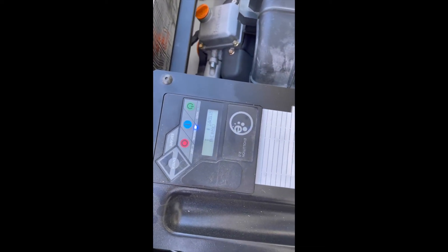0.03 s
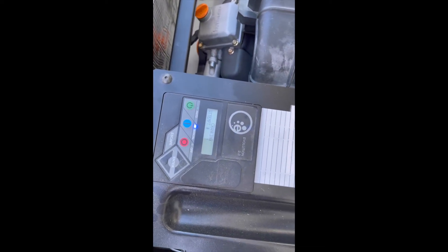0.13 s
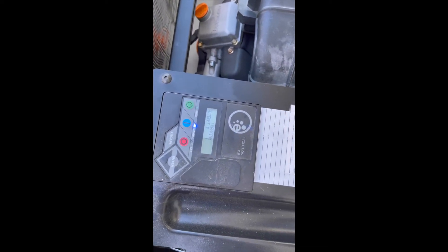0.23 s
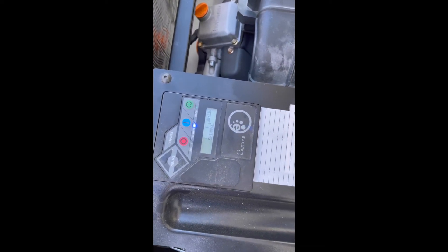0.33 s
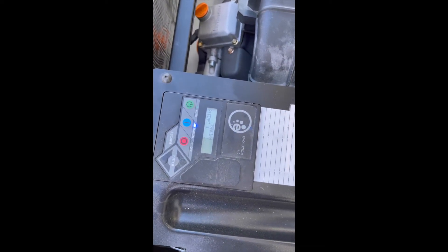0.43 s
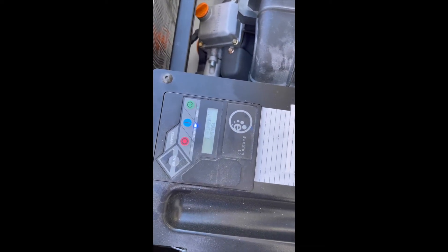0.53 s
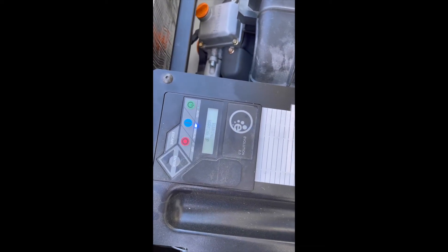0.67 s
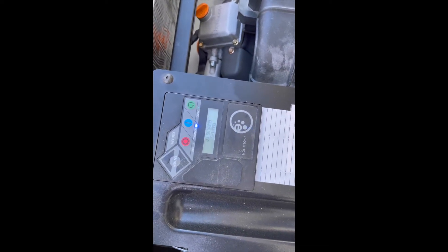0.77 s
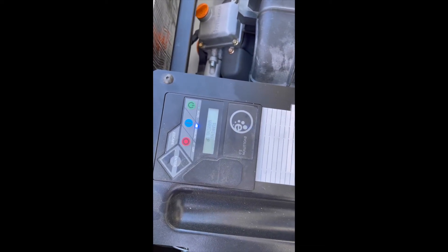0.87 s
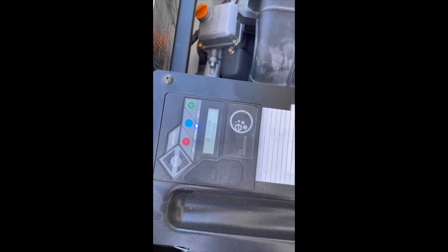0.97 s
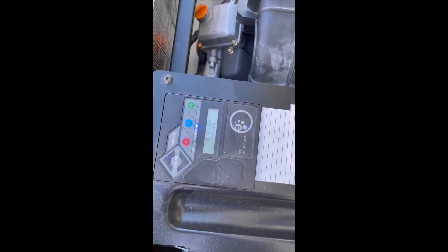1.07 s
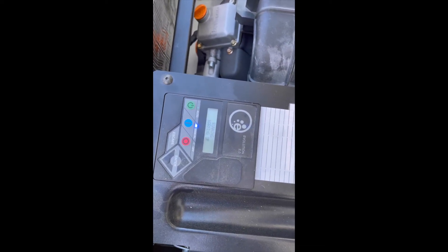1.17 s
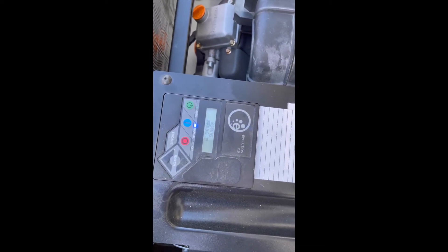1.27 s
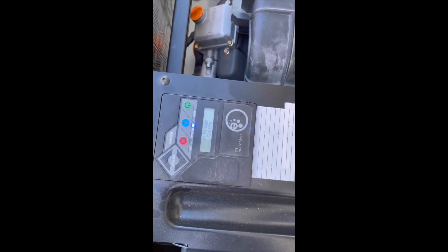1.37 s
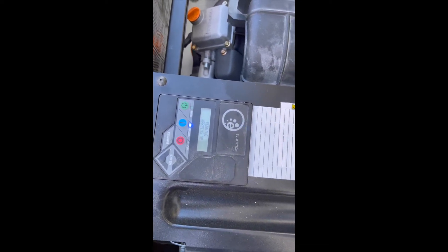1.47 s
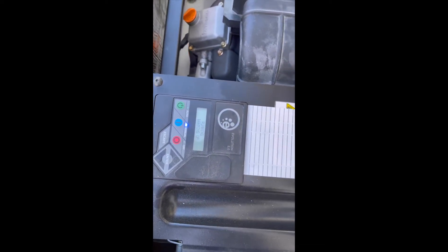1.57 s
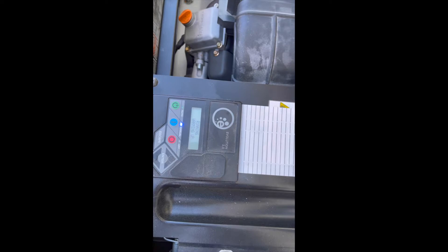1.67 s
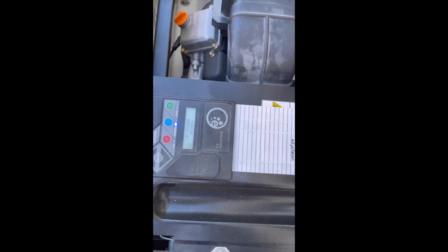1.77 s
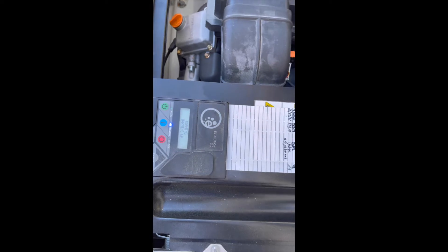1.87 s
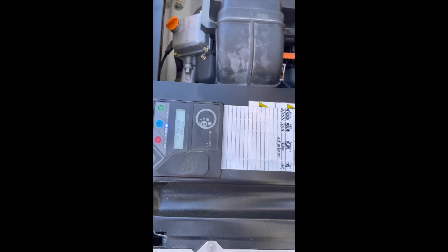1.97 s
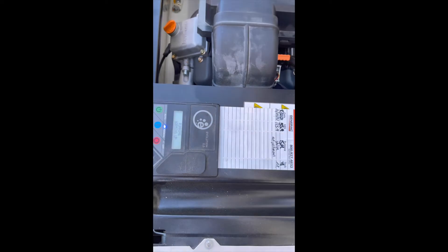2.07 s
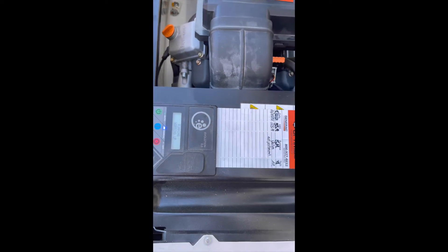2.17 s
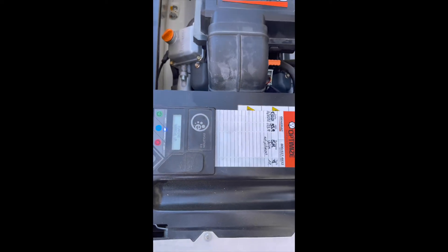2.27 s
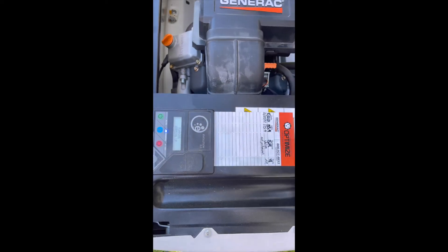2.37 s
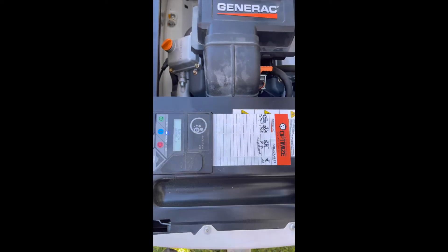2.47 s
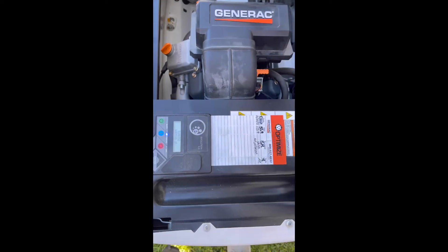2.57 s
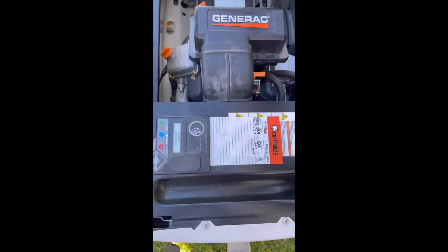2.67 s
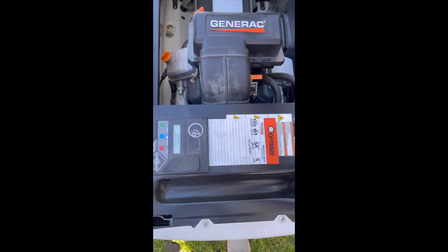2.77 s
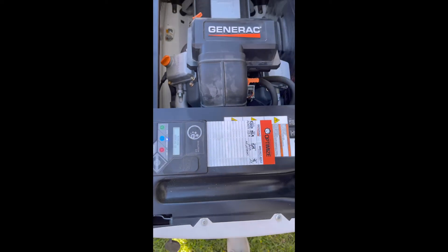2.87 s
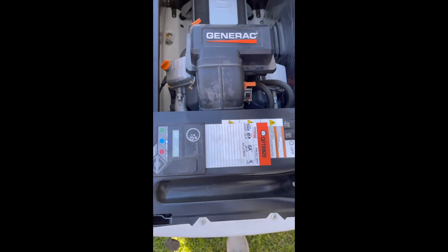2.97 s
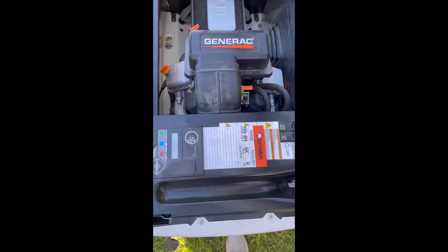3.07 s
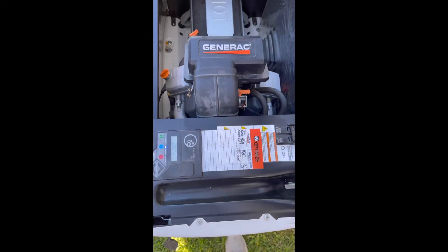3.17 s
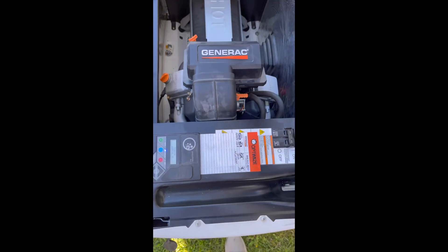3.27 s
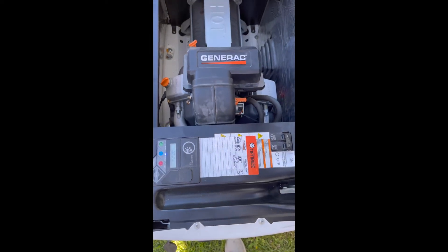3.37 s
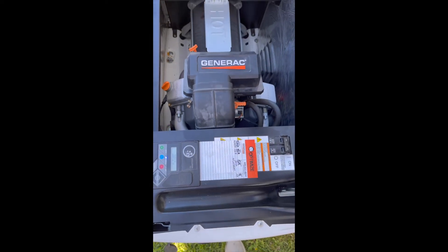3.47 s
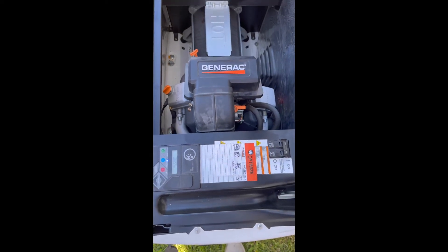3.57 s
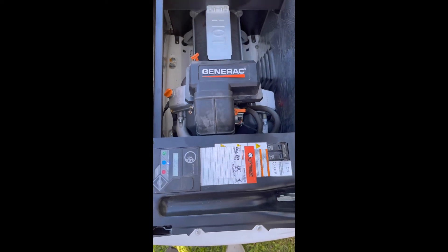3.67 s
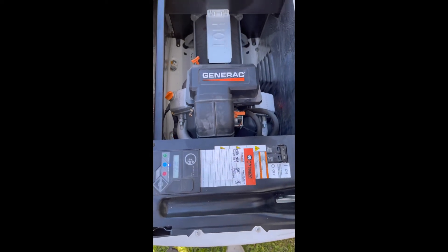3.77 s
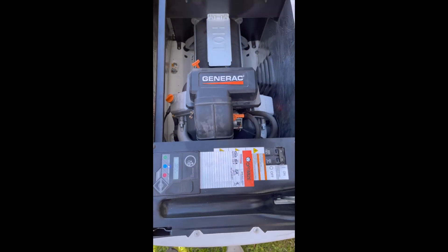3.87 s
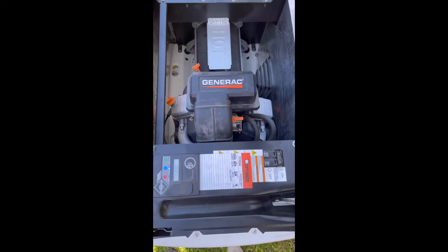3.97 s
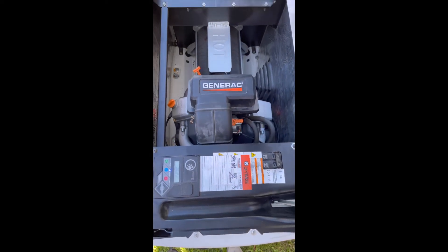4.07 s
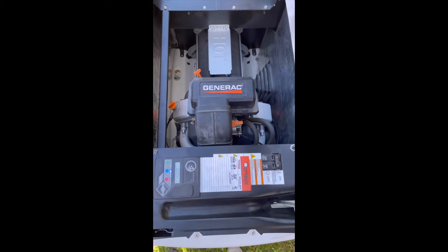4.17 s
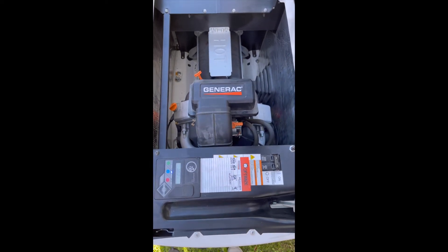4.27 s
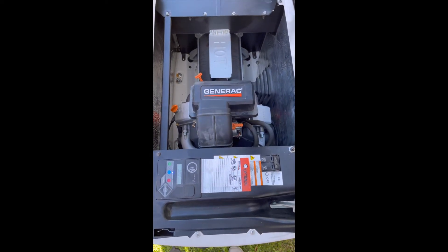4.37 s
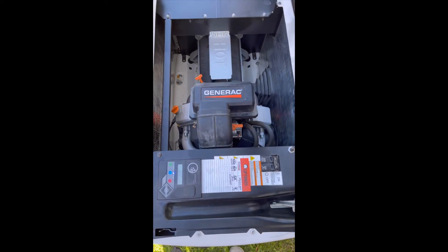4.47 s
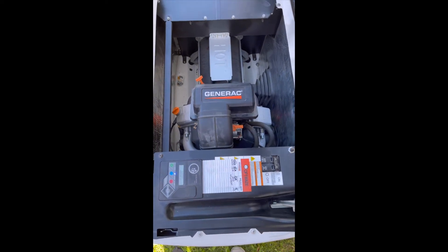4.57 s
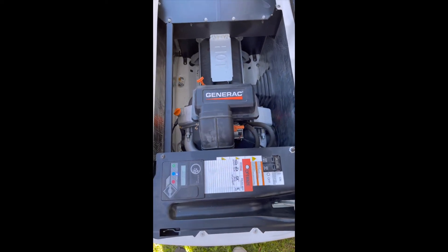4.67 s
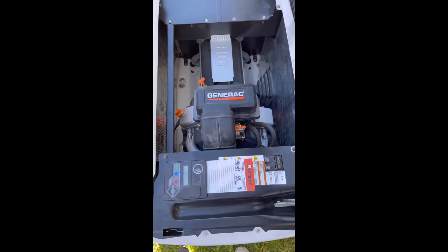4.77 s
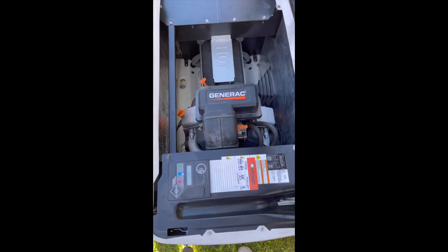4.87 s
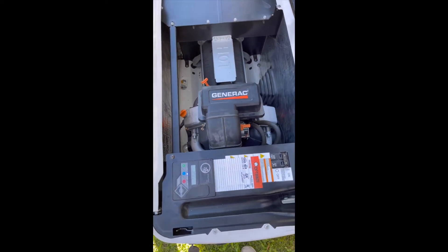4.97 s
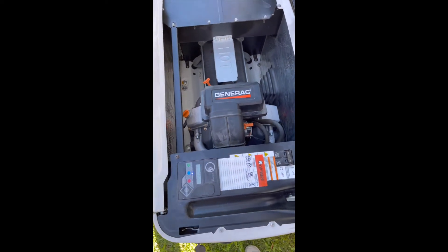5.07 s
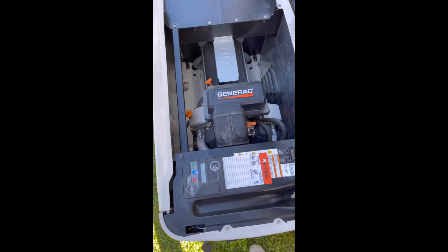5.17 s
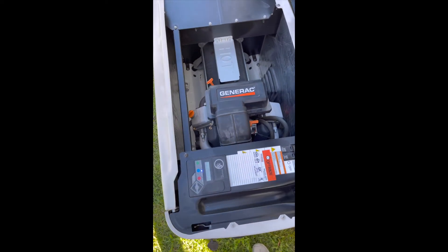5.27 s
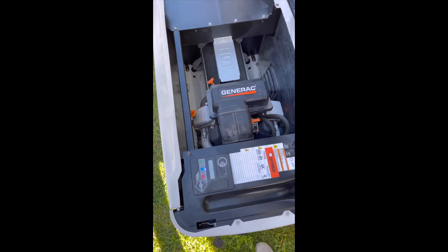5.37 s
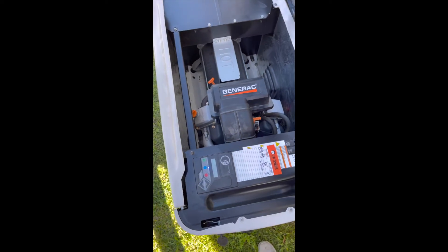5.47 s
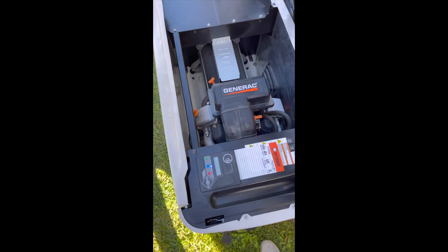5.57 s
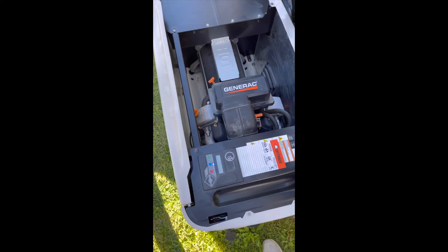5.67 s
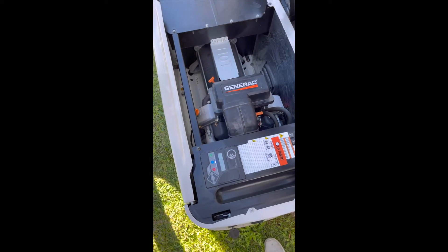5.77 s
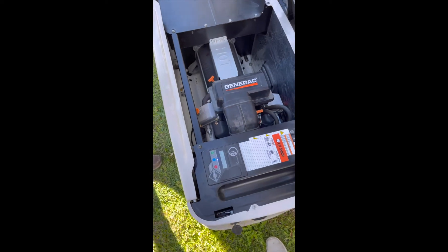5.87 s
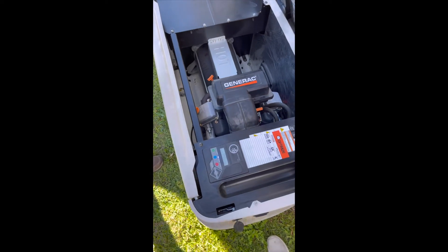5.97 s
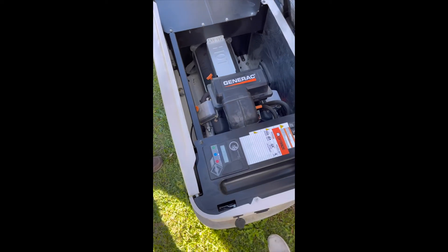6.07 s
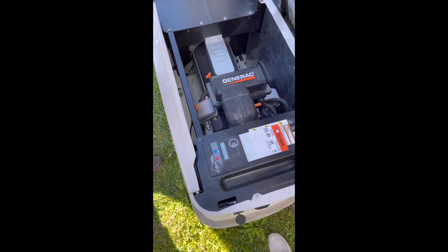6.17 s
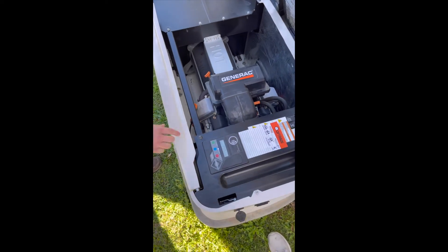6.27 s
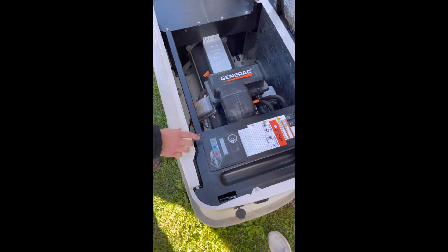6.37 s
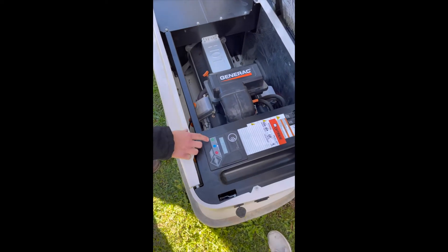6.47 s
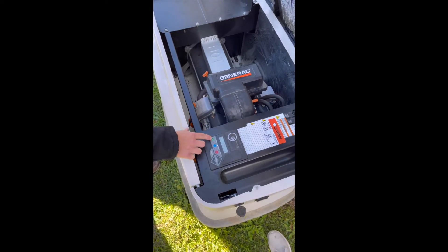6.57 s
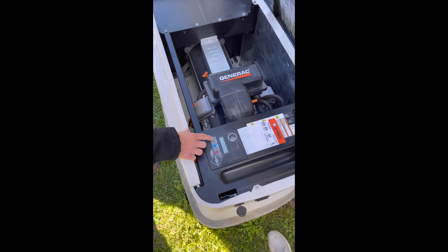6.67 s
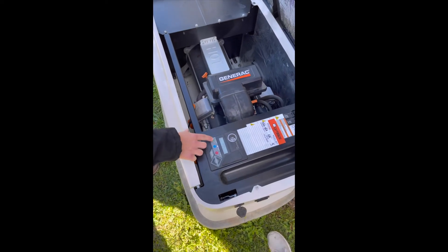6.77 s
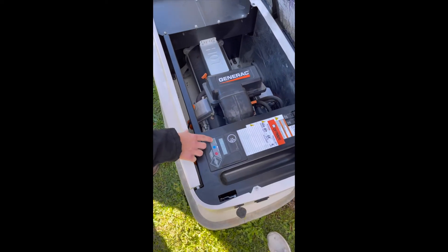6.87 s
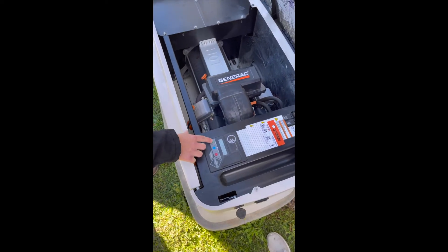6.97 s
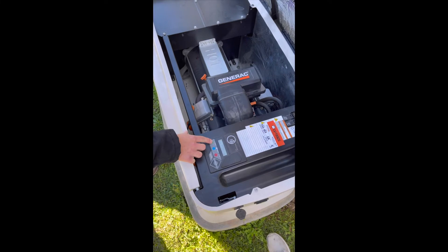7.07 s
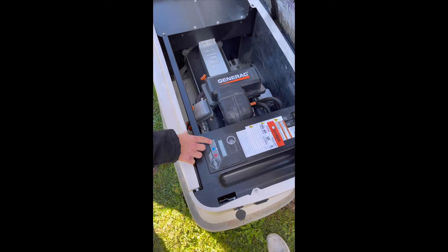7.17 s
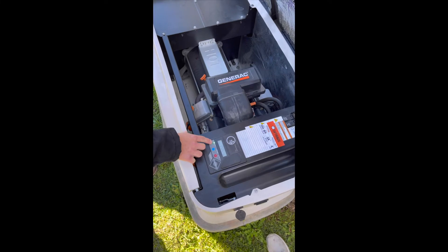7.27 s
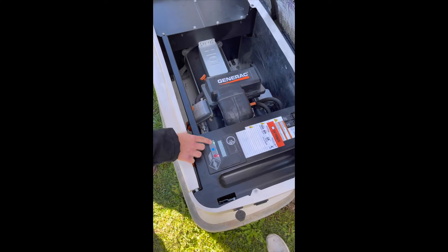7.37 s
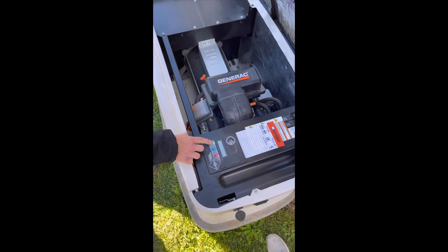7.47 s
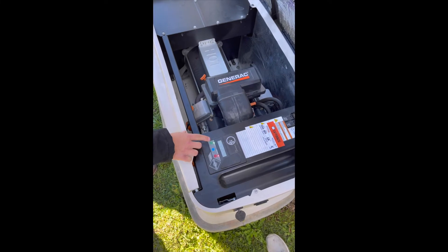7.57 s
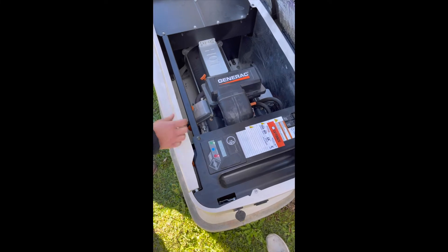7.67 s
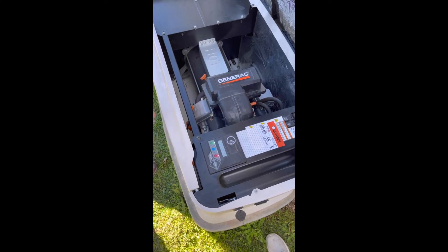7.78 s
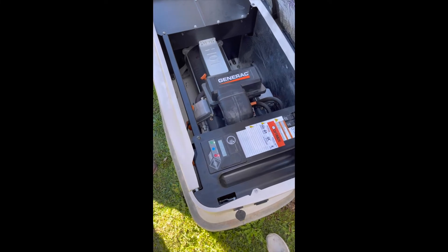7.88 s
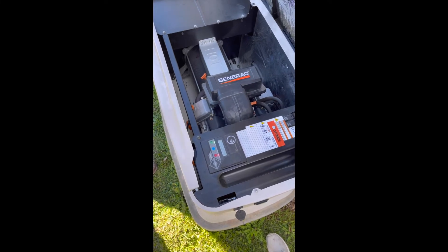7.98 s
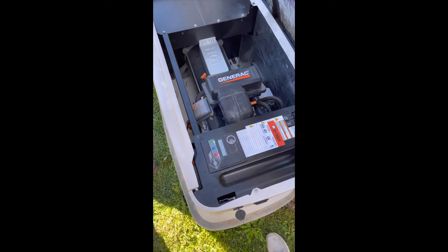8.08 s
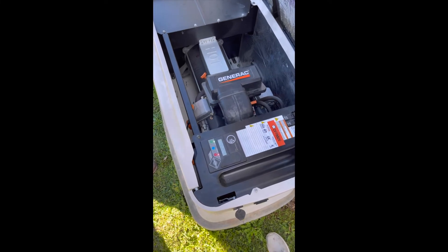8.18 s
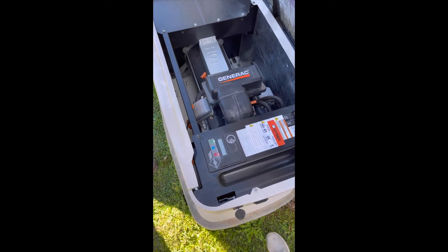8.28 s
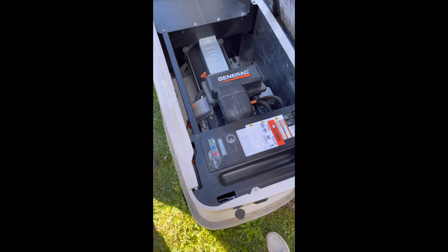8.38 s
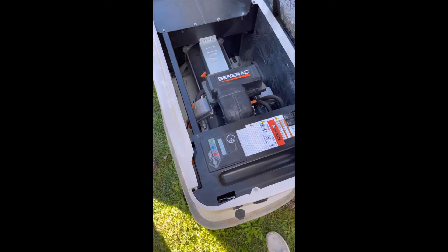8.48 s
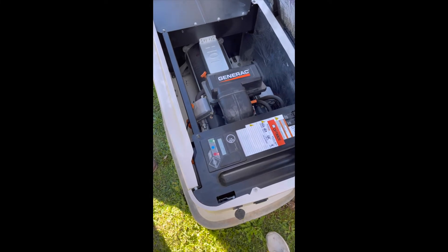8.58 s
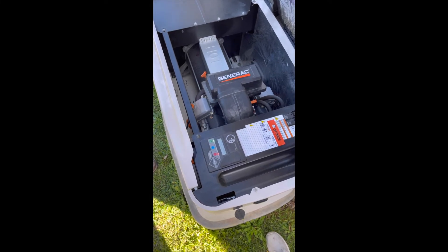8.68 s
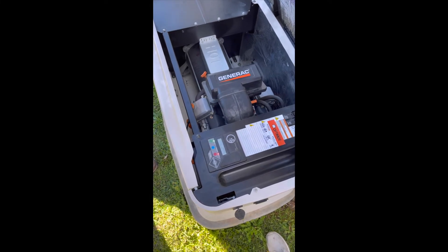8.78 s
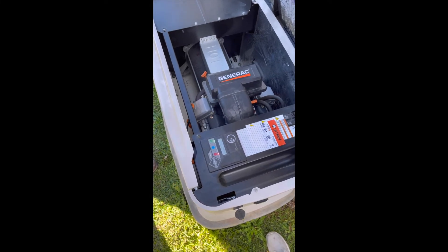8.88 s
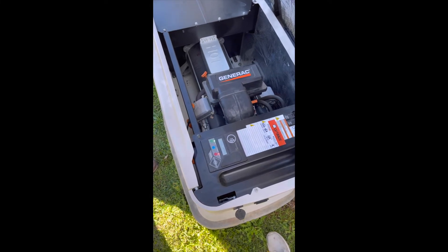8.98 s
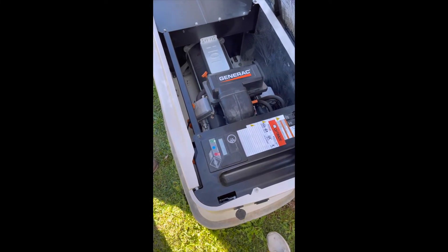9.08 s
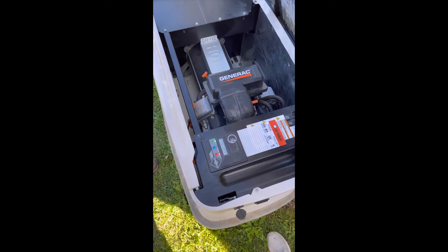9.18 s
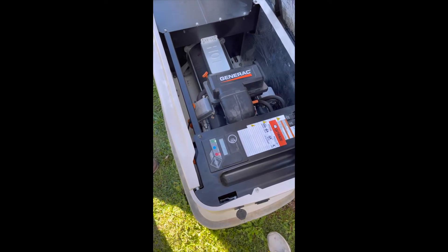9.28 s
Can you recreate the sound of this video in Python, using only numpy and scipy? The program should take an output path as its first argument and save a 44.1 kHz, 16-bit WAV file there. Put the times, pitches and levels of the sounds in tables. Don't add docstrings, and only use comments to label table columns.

```python
import sys
import numpy as np
from scipy import signal
from scipy.fft import rfft, irfft
from scipy.io import wavfile
from scipy.ndimage import uniform_filter1d

SR = 44100
rng = np.random.default_rng(int(sys.argv[2]) if len(sys.argv) > 2 else 0)


def natural_amplitude(level_db):
    exponent = np.asarray(level_db, float) / 20
    return 10 ** exponent


def log_audio(samples):
    frames = np.atleast_2d(samples).T
    limited = np.clip(frames, -1, 1)
    pcm = np.round(limited * 32767).astype(np.int16)
    wavfile.write(sys.argv[1], SR, pcm)


N = 411012
TIME = np.arange(N) / SR
HZ = np.fft.rfftfreq(N, 1 / SR)
CUT_S, SETTLE_S = 7.485, .08


def curve(table):
    s, *columns = np.transpose(table)
    return [np.interp(TIME, s, c) for c in columns]


def over_hz(table):
    hz, value = np.transpose(table)
    return np.interp(np.log(HZ + 1), np.log(hz), value)


def coloured(x, table):
    y = irfft(rfft(x) * natural_amplitude(over_hz(table)), N)
    return y / y.std()


def walk(rate, size=N):
    k = int(SR / rate * size / N)
    held = np.repeat(rng.standard_normal(size // k + 1), k)
    return 1.35 * uniform_filter1d(uniform_filter1d(held, k), k)[:size]


def grit(spread_db, rate):
    return rng.standard_normal((3, N)) * natural_amplitude(spread_db * walk(rate))


# (time [s], speed [turns/s])
RUN_UP = [(0, 43.1), (.18, 44.37), (.36, 46.07), (.7, 48.77), (.91, 49.7), (1.14, 51.2), (1.38, 51.77),
          (1.55, 52.77), (1.79, 53.63), (2.2, 54.8), (2.62, 56.37), (3.06, 57.47), (3.6, 57.8),
          (4.21, 58.9), (4.65, 58.9), (5.5, 59.47), (6.39, 59.77), (7.42, 60.05)]


def crank_speed():
    coast_s = 2.455
    return curve(RUN_UP)[0] * np.exp(-np.maximum(TIME - CUT_S, 0) / coast_s)


# (time [s], opening [0-1])
THROTTLE = [
    (0.0, 0.36),
    (0.5, 0.71),
    (1.2, 0.71),
    (2.3, 0.65),
    (3.3, 0.5),
    (4.2, 0.07),
    (5.7, 0.15),
    (7.4, 0.19),
]
# (centre [Hz], width [Hz], boost [dB])
HOUSING = [(84, 24, 4), (126, 20, 12), (146, 8, 3), (175, 74, 14), (227, 24, 11), (293, 36, 12),
           (342, 8, 6), (420, 12, 6), (440, 44, 9), (468, 24, 8), (532, 19, 4), (583, 47, 6), (719, 30, 8),
           (898, 12, 7)]
# (order [per turn], full throttle [dB rms], governed [dB rms],
# coasting [dB rms])
CRANK_ORDERS = [(1.0, -49.0, -46.0, -55.0), (2.0, -45.0, -59.0, -60.0), (3.0, -30.0, -57.0, -57.0),
                (4.0, -40.0, -43.0, -53.0), (5.0, -50.0, -44.0, -53.0), (6.0, -55.0, -41.0, -54.0),
                (7.0, -40.0, -41.0, -57.0), (8.0, -30.0, -42.0, -50.0), (9.0, -43.0, -43.0, -56.0),
                (10.0, -44.0, -42.0, -52.0), (11.0, -60.0, -41.0, -60.0), (12.0, -41.0, -43.0, -49.0),
                (13.0, -50.0, -42.0, -55.0), (14.0, -45.0, -43.0, -54.0), (15.0, -49.0, -43.0, -49.0),
                (16.0, -41.0, -45.0, -48.0), (17.0, -45.0, -53.0, -56.0), (18.0, -44.0, -39.0, -54.0),
                (1.5, -48.0, -49.0, -45.0), (2.5, -42.0, -55.0, -53.0), (3.5, -54.0, -49.0, -61.0),
               (4.5, -50.0, -49.0, -56.0), (5.5, -34.0, -51.0, -54.0), (6.5, -34.0, -47.0, -53.0),
               (7.5, -40.0, -48.0, -55.0), (8.5, -45.0, -46.0, -58.0), (9.5, -43.0, -48.0, -56.0),
               (10.5, -49.0, -47.0, -61.0), (11.5, -54.0, -48.0, -55.0), (12.5, -53.0, -43.0, -59.0),
               (13.5, -46.0, -50.0, -61.0), (14.5, -55.0, -44.0, -56.0), (15.5, -49.0, -49.0, -59.0),
               (16.5, -42.0, -49.0, -58.0), (17.5, -48.0, -49.0, -58.0)]


def crank_tones(turns, speed):
    step = 8
    time, throttle = TIME[::step], curve(THROTTLE)[0][::step]
    turns, speed = turns[::step], speed[::step]
    size = len(time)
    grid = np.arange(1200)
    boost_db = sum(db / (1 + (2 * (grid - hz) / width) ** 2) for hz, width, db in HOUSING)
    cut = np.clip((time - CUT_S) / SETTLE_S, 0, 1)
    pumping_db = 1.7 + 22 * np.log10(speed / 46)
    out = 0
    for order, full_db, governed_db, coast_db in CRANK_ORDERS:
        uneven = min(order / 4, 1)
        burning_db = governed_db + throttle * (full_db - governed_db)
        db = (1 - cut) * burning_db + cut * (coast_db + pumping_db)
        db = db + 0.64 + boost_db[(order * speed).astype(int)]
        gain = natural_amplitude(db + 1.3 * uneven * walk(5, size=size))
        jitter = .25 * uneven * walk(7, size=size)
        out = out + gain * np.sin(2 * np.pi * (order * turns + rng.random()) + jitter)
    return np.sqrt(2) * signal.resample_poly(out, step, 1)[:N]


# (time [s], level [dB rms])
FAN_LEVEL = [(0, -31), (.8, -31), (1.3, -28), (1.9, -27), (2.3, -34), (2.8, -36), (3.3, -32), (4.2, -37),
             (5.1, -39), (5.6, -33), (6.2, -29), (7.5, -28), (7.9, -34), (8.15, -42), (8.7, -44),
             (8.9, -37), (9.05, -43), (9.32, -39)]
# (order [per turn], level [dB rms])
WHISTLES = [(22, -45), (24, -46), (26, -47), (28, -46), (30, -48), (32, -48), (36, -44), (38, -50),
            (40, -49), (42, -51)]


def fan(turns, speed):
    blades = 20
    level = natural_amplitude(curve(FAN_LEVEL)[0] + 1 + 1.3 * walk(12))
    out = level * np.sin(2 * np.pi * blades * turns + .3 * walk(25))
    fading = np.where(TIME > CUT_S + SETTLE_S, (speed / 58) ** 4, 1)
    for order, db in WHISTLES:
        level = natural_amplitude(db + 3.4 * walk(5)) * fading
        out += level * np.sin(2 * np.pi * order * turns + 0.69 * walk(20))
    return np.sqrt(2) * out


# (time [s], level [dB])
DISTANCE = [(0, -4), (.03, 0.5), (.12, -3), (.31, 0), (.55, -1), (1.4, 0.5), (1.7, -1.5), (2.1, -.5),
            (2.8, -2.5), (3.8, -3.5), (4.4, -3), (5.3, -2), (5.8, -5), (7, -5), (7.4, -4.5), (8.9, -4),
            (9.12, -6), (9.27, -5.5)]


def loudness(speed, close_db, share, burn_db, halving_db):
    dying = np.clip((TIME - CUT_S) / 0.6, 0, 1)
    slowing = np.where(TIME > CUT_S, np.log2(60 / speed), 0)
    return natural_amplitude(close_db + share * curve(DISTANCE)[0] - burn_db * dying - halving_db * slowing)


TICK_STAGES = [.6, 1.7, 3, 7.7, 8.45]


def staged(catching, rising, governed, coasting):
    return np.interp(TIME, TICK_STAGES, [catching, rising, governed, governed, coasting])


# (place in two-turn cycle [0-1], decay [ms], ring [Hz], width [Hz], level [dB])
BURN_TICKS = [
    (0.9, .79, 6620, 960, 0),
    (.7, 11, 11400, 1900, -3.5),
    (.35, 8.4, 11430, 1540, 0.5),
    (.35, 21, 3120, 126, -3),
    (.62, 21.5, 2310, 300, -5),
    (.4, 28, 1930, 140, -1.5),
    (0.5, 14., 9000, 680, -2),
]
# (place in two-turn cycle [0-1], decay [ms], ring [Hz], width [Hz], level [dB])
TAPPET_TICKS = [
    (.5, 5, 7050, 1550, 1),
    (.66, 12, 3300, 170, -2.5),
    (.1, 8, 4250, 320, -4),
]
# (place in two-turn cycle [0-1], decay [ms], ring [Hz], width [Hz], level [dB])
SLACK_TICKS = [
    (.41, 9.8, 10620, 930, 6.5),
    (.4, 2.1, 8000, 5000, -1.5),
    (.45, 6.8, 4200, 500, 3),
    (.8, 1.8, 8100, 2000, -7.5),
    (0.9, 5.5, 6700, 1700, -0.5),
    (0.8, 5.6, 3310, 360, 5),
    (.9, 4., 9900, 1200, -6),
]


def valve_ticks(turns):
    out, hiss = 0, rng.standard_normal((3, N))
    groups = [(BURN_TICKS, staged(0, -2, -8.5, -14), 2),
              (TAPPET_TICKS, staged(1, -7, -9, 0), 2.5),
              (SLACK_TICKS, staged(-24, -24, -18, -0.5), 2.5)]
    for ticks, stage_db, scatter_db in groups:
        for place, decay_ms, hz, width, db in ticks:
            cycle = np.floor(turns / 2 - place).astype(int) + 1
            strength = natural_amplitude(scatter_db * rng.standard_normal(N // 100))
            strike = np.diff(cycle, prepend=cycle[0]) * strength[cycle]
            puff = signal.lfilter([1], [1, -np.exp(-1000 / (decay_ms * SR))], strike)
            band = signal.butter(3, [hz - width / 2, hz + width / 2], "band", fs=SR, output="sos")
            out = out + signal.sosfilt(band, puff * natural_amplitude(stage_db + db + 14) * hiss)
    return out


# (frequency [Hz], density [dB per Hz])
GEAR_COLOUR = [(4600, -18.5), (5600, 0.5), (6100, -2), (6800, -1), (8200, -3.5), (9000, -0.5), (9600, -4),
               (10900, 2), (11500, -2), (12400, -15), (13800, -16), (15000, -25.5), (15800, -40)]


def valve_gear(turns, speed):
    hiss = natural_amplitude(staged(0, 0, 0, -1.5)) * coloured(grit(0.97, 200), GEAR_COLOUR)
    gain = loudness(speed, close_db=-24, share=1.09, burn_db=4, halving_db=3)
    return gain * (hiss + valve_ticks(turns))


# (frequency [Hz], density [dB per Hz])
TIN_COLOUR = [(1300, -22.5), (1700, -8), (2100, -0.5), (2500, -1.5), (2950, -4), (3150, -3), (3500, -6),
              (4200, -6), (4700, -9), (5000, -9.5), (5600, -33)]


def tin_covers(speed):
    gain = loudness(speed, close_db=-27.5, share=0.04, burn_db=6.5, halving_db=3)
    return gain * coloured(grit(0.82, 150), TIN_COLOUR)


# (frequency [Hz], density [dB per Hz])
ROAR_COLOUR = [(25, -50), (45, -40), (80, -15), (118, -11.5), (200, -1.5), (300, -2.5), (390, -3.5),
               (474, -0.5), (720, -3), (1000, -6), (1300, -10), (1900, -15), (2500, -28), (4000, -90)]


def cooling_roar(turns, speed):
    throb = 1 + 0.13 * np.cos(np.pi * turns - 2.2) + 0.11 * np.cos(4 * np.pi * turns + 1.4)
    gain = loudness(speed, close_db=-20.5, share=0.37, burn_db=3, halving_db=5.5)
    return gain * throb * coloured(grit(0.87, 40), ROAR_COLOUR)


# (frequency [Hz], share [0-1])
LIKENESS = [(100, 1), (500, 0.95), (1100, 0.95), (1500, 0.99), (2000, 0.83), (2700, 0.19), (3700, .55),
            (4500, 0.075), (5200, 0.64), (6050, 0.75), (7500, 0.89), (8900, 0.98), (10300, 1),
            (12200, 0.65)]


def at_ports(noise):
    noise = rfft(noise)
    lag = np.minimum(np.pi * HZ / 6050, 2 * np.pi) * np.interp(HZ, (3780, 5360), [0, 1])
    common = np.clip(over_hz(LIKENESS), 0, 1)
    shared = np.exp(1j * np.array([lag, -lag])) * noise[0]
    return np.sqrt(common) * shared + np.sqrt(1 - common) * noise[1:]


# (time [s], left minus right [dB])
LEAN = [
    (0, -1.3),
    (2.8, -1.3),
    (4.2, .1),
    (7.4, 0),
    (7.8, -.3),
    (9.32, -.3),
]


def lean_bass(heard):
    bass = irfft(heard / (1 + (HZ / 900) ** 4), N)
    lean = natural_amplitude(curve(LEAN)[0] / 2) - 1
    return irfft(heard, N) + bass * np.array([lean, -lean])


def scene():
    speed = crank_speed()
    turns = np.cumsum(speed) / SR
    tones = crank_tones(turns, speed) + fan(turns, speed)
    noise = valve_gear(turns, speed) + tin_covers(speed) + cooling_roar(turns, speed)
    return lean_bass(at_ports(noise) + rfft(tones))


def roll_off(x):
    return signal.sosfilt(signal.butter(12, 15740, fs=SR, output="sos"), x)


def record(dry):
    thinned = signal.sosfilt(signal.butter(2, 42, "high", fs=SR, output="sos"), dry)
    mix = np.tanh(0.9 * thinned) / 0.91
    return roll_off(mix)


dry = scene()
out = record(dry)
log_audio(out)
```